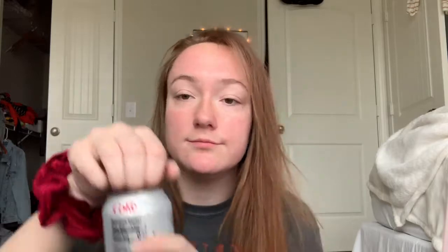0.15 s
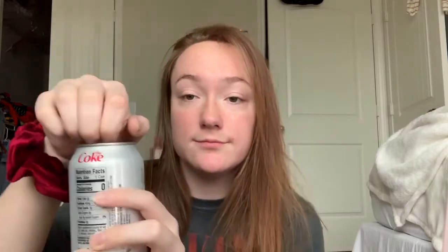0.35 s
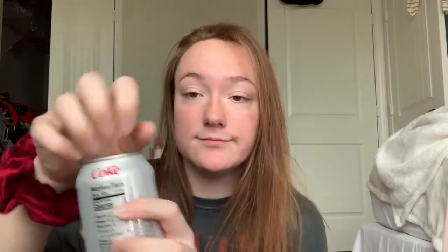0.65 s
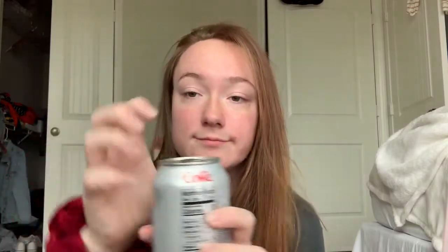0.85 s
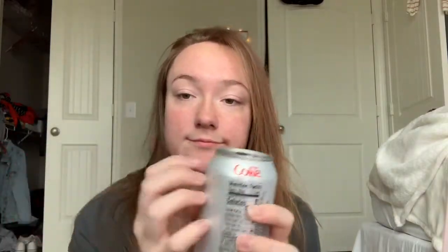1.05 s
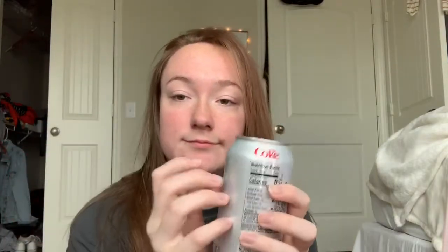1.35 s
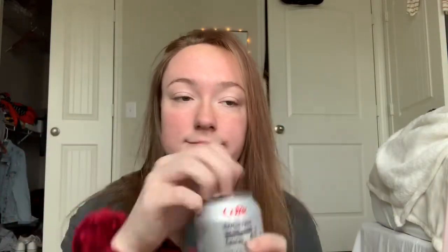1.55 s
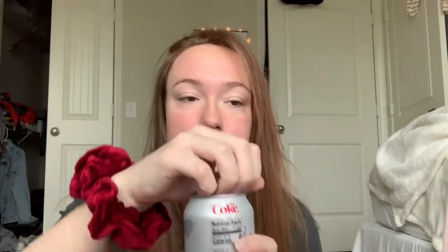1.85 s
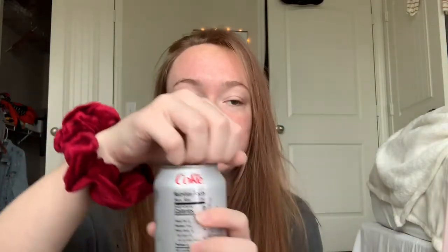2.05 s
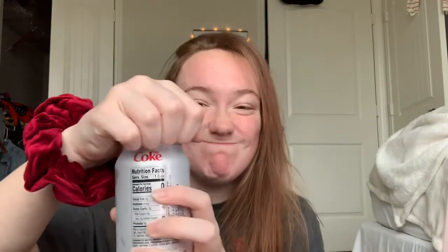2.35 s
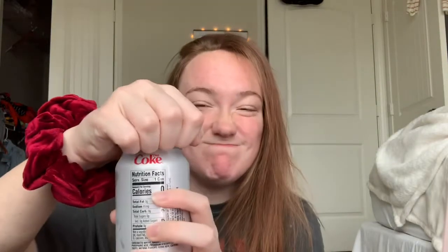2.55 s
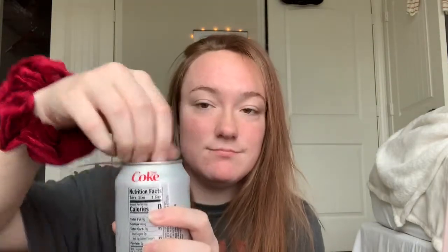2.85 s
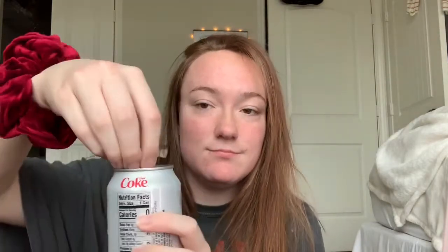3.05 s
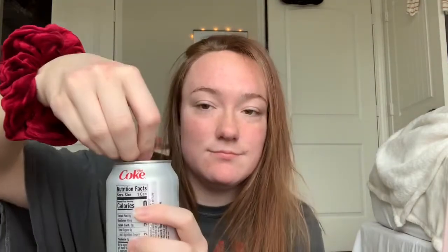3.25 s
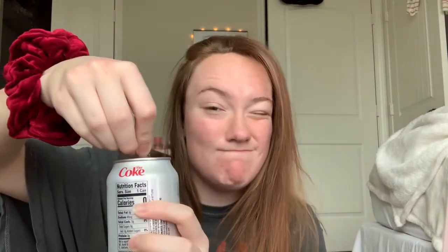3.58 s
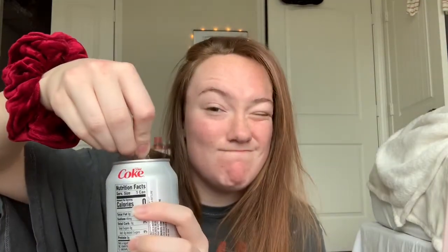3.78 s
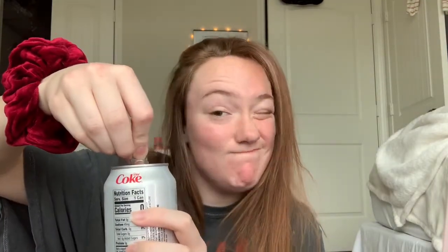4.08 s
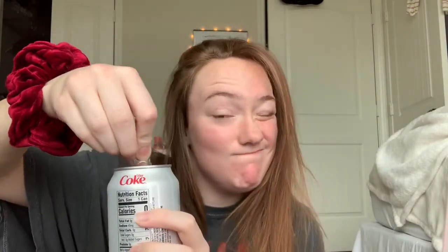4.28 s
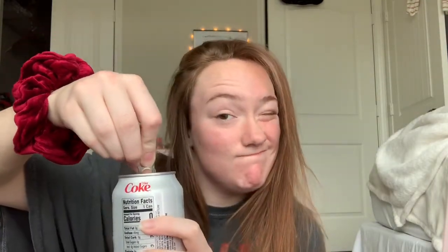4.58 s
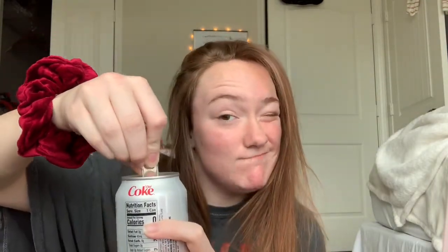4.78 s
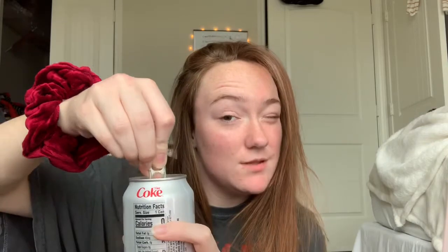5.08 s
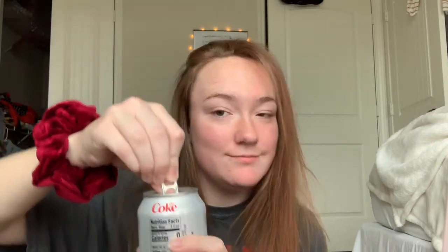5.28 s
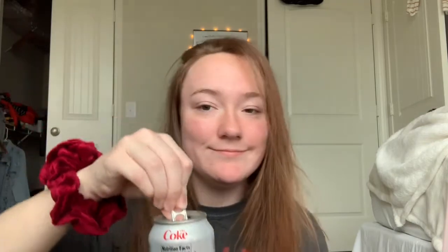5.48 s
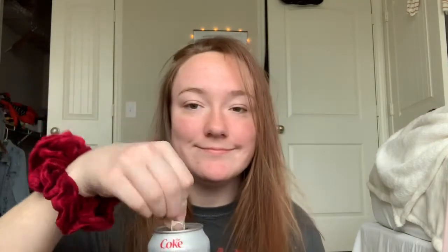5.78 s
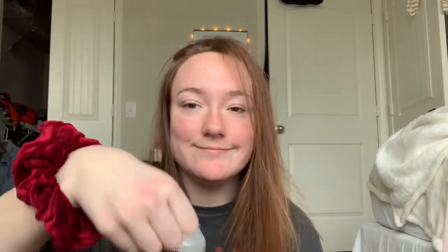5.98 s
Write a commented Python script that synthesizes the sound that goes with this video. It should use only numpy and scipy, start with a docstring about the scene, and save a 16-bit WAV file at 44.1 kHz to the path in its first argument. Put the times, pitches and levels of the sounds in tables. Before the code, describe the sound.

A quiet small bedroom with soft low rumble and steady air, heard close up in stereo. From 0 to 1.8 s, fingers lightly rub and tap a full aluminium can: faint scrapes and small tinny ticks, clearer around 0.27, 0.65 and 1.25-1.3 s. A bright hard click lands at 1.88 s, a softer one at 2.0. At 2.41 s the seal cracks very loudly, gas hisses sharply for about a tenth of a second, and a second, hollower crack at 2.5 s ends it. Soft fumbling ticks follow from 2.8 s, a crisp loud snap at 3.13, a small cluster near 3.5, and a rattling burst of clicks at 4.1-4.16. Separate metallic ticks at 4.34, 4.43, 4.64 and 4.77 lead to the lid tearing open at 4.82 s with a loud crack and short breathy puff. Faint fizz dies away with tiny taps until 5.4, swelling barely near 5.8 before room quiet at about 6.1.

```python
"""A small quiet bedroom: a full aluminium can is handled and opened close to a phone with two microphone ports.
Fingers rub, tap and pick at the tab: filtered noise for skin, bursts of slips ringing the can's modes for clicks.
The seal cracks with a short jet of gas and the lid tears open later: noise through resonances of the gas space.
Rough tones linger after some blows, and sparse random pops make the drink fizz faintly.
A noise-built room tail answers it all, over steady air, wavering tones and the low rumble of the house."""
import sys
import numpy as np
from scipy import signal
from scipy.fft import rfft, irfft, next_fast_len
from scipy.io import wavfile
from scipy.ndimage import uniform_filter1d, minimum_filter1d

SR = 44100
rng = np.random.default_rng(int(sys.argv[2]) if len(sys.argv) > 2 else 0)


def store_pcm(level_fs):
    """Save levels as 16-bit WAV."""
    pcm = np.round(np.clip(level_fs, -1, 1) * 32767).astype(np.int16)
    wavfile.write(sys.argv[1], SR, np.atleast_2d(pcm).T)


N = 270333  # samples


def undb(db):
    """Decibels to an amplitude ratio."""
    return 10 ** (np.asarray(db) / 20)


def level(x, db):
    """Scale a signal to an RMS level in dB."""
    return x * undb(db) / np.sqrt(np.mean(x ** 2))


def on_log(hz, table):
    """Read a (pitch_hz, value) table on a log-frequency axis."""
    at, value = np.transpose(table)
    return np.interp(np.log(hz + 1), np.log(at), value)


def colour(x, table):
    """Causal filter with the (pitch_hz, level_db) shape, from the folded cepstrum."""
    n = next_fast_len(x.shape[-1])
    gain = undb(on_log(np.fft.rfftfreq(n, 1 / SR), table))
    cepstrum = irfft(np.log(gain), n)
    cepstrum[1:n // 2] *= 2
    cepstrum[n // 2 + 1:] = 0
    response = np.exp(rfft(cepstrum))
    return irfft(rfft(x, n) * response, n)[..., :x.shape[-1]]


def band(x, hz, width_hz):
    """One resonance of the given pitch and width."""
    return signal.lfilter(*signal.iirpeak(hz, hz / width_hz, SR), x)


def envelope(tables, column=1):
    """Summed gain along tables of (time_s, level_db, ...), silent outside each."""
    t = np.arange(N) / SR
    gain = 0
    for table in tables:
        time_s, level_db = np.transpose(table)[[0, column]]
        gain = gain + undb(np.interp(t, time_s, level_db, -200, -200))
    return gain


def walk(rate):
    """Random level that slides to a new value `rate` times a second; spread near 1."""
    k = int(SR / rate)
    steps = np.repeat(rng.standard_normal(N // k + 1), k)
    return 1.2 * uniform_filter1d(steps, k)[:N]


# Spectrum of the room air, relative: pitch_hz, level_db (per Hz)
AIR_COLOUR = [(60, 1.5), (123, -6.5), (146, -13.5), (177, -3.5), (216, -15), (310, -12.5), (434, -19),
              (700, -28.5), (1300, -32), (1550, -40.5), (1850, -54.5), (4000, -56), (8000, -60.5),
              (13500, -64.5), (15000, -87.5)]


def house_air(air_db=-52.5, alike_hz=330):
    """Steady air noise, the same at both ports in the bass and partly different above alike_hz."""
    pair = np.array([[1], [-1]])
    side = signal.lfilter(*signal.butter(2, alike_hz, "high", fs=SR), rng.standard_normal(N))
    air = colour(rng.standard_normal(N) + .75 * side * pair, AIR_COLOUR)
    above_rumble = signal.butter(3, 95, "high", fs=SR, output="sos")
    return level(signal.sosfilt(above_rumble, air), air_db)


# Swell of the house rumble: time_s, level_db
RUMBLE_SWELL = [(0.0, -52), (0.01, -49.5), (1.3, -52), (1.55, -44.5), (1.64, -54.5), (3.0, -51), (4.3, -56),
                (4.46, -52.5), (6.13, -50)]


def house_rumble():
    """Noise from 20 to 95 Hz that swells and sinks, nearly alike at both ports."""
    pair = np.array([[1], [-1]])
    noise = rng.standard_normal(N) + 0.16 * rng.standard_normal(N) * pair
    lowest = signal.butter(3, [20, 95], "band", fs=SR, output="sos")
    return envelope([RUMBLE_SWELL]) * level(signal.sosfilt(lowest, noise), 0)


# Wavering low tones: pitch_hz, width_hz, level_db
HUM_TONES = [(50.6, 12, -58), (129.5, 6.1, -65), (187, 30, -59), (244.5, 4.7, -66)]


def house_hum():
    """Narrow bands of noise waver like unsteady tones, the same at both ports."""
    hum = 0
    for hz, width_hz, db in HUM_TONES:
        tone = band(band(rng.standard_normal(N), hz, width_hz), hz, 3 * width_hz)
        hum = hum + level(tone, db)
    return hum


# Time for the room to fall 60 dB: pitch_hz, t60_s
ROOM_DECAY = [(500, 0.72), (1700, 0.12), (3700, 0.4), (7000, 0.2), (14000, 0.2)]


def room(x, db=-14, early_db=-8, gap_s=0.0041, rise_s=0.002):
    """Hand and desk reflect first, walls after a gap; decay varies with pitch, ports are unrelated."""
    t = np.arange(SR * 3 // 5) / SR
    tail = 0
    for hz in 250 * np.sqrt(2) ** np.arange(12):  # half-octave bands
        noise = band(rng.standard_normal((2, len(t))), hz, hz / 3)
        tail = tail + noise * undb(-60 * t / on_log(hz, ROOM_DECAY))
    walls = 1 - np.exp(-np.maximum(t - gap_s, 0) / rise_s)
    tail = tail * (undb(early_db) + walls)
    tail = tail / np.sqrt(np.mean(np.sum(tail ** 2, axis=1)))  # unit energy
    return undb(db) * signal.fftconvolve(x[None], tail)[:, :N]


# Spectrum of the bubbles, relative: pitch_hz, level_db (per Hz)
BUBBLE_COLOUR = [(1500, -31), (2300, -6.5), (3100, 2.5), (4200, -8), (5500, -4), (7000, -13), (10700, -15),
                 (15000, -42)]


def fizz(start_s=4.97, start_db=-53, settled_db=-89.5, settle_s=0.35, spread_db=1.5):
    """Many tiny bubbles burst, most of them small; the froth settles and swells once more.

    Levels are those before the mix trim."""
    surge_s, surge_db, surge_width_s = 5.78, 13, 0.092
    t = np.arange(N) / SR
    settle = np.exp(-np.maximum(t - start_s, 0) / settle_s)
    surge = surge_db * np.exp(-((t - surge_s) / surge_width_s) ** 2)
    db = settled_db + (start_db - settled_db) * settle + surge
    bursting = rng.random(N) < .1
    pops = rng.standard_normal(N) * bursting * undb(spread_db * rng.exponential(size=N))
    return (t > start_s) * undb(db) * level(colour(pops, BUBBLE_COLOUR), 0)


# Tones left in lid and gas space after the harder blows; level is before fade and port balance:
# start_s, pitch_hz, sink_hz, level_db, t60_s
LINGERING_TONES = [(.272, 4290, 40, -54, 0.17), (.648, 2350, 3, -49.5, 0.1), (1.252, 608, 3, -45, .15),
                   (1.307, 1286, 3, -50.5, 0.28), (1.885, 2366, 3.4, -39.5, 0.18),
                   (2.51, 3767, 125, -37.5, 0.81), (2.5235, 1773, 20, -9, 0.06),
                   (2.535, 1874, 243, -36.5, 0.54), (3.127, 1166, 2.7, -33, .06),
                   (3.51, 3700, 2.5, -49.5, 0.28), (4.142, 3880, 106, -43, 0.39),
                   (4.83, 3397, 107, -31, 0.46)]


def linger(width=.1):
    """Slow noise roughens a sinking, fading sine; ports unrelated, the right one nearer.

    width is a share of the pitch."""
    out = np.zeros((2, N + SR))
    t = np.arange(SR // 2) / SR
    for start_s, first_hz, sink_hz, db, t60 in LINGERING_TONES:
        wobble = rng.standard_normal((2, len(t))) + 1j * rng.standard_normal((2, len(t)))
        wobble = signal.lfilter(*signal.butter(2, width * first_hz / 2, fs=SR), wobble)
        hz = first_hz - sink_hz * (1 - np.exp(-t / .1))
        carrier = np.exp(2j * np.pi * np.cumsum(hz) / SR)
        tone = level((wobble * carrier).real, db)
        fade = undb(-60 * t / t60) * np.minimum(t / .002, 1)
        i = int(start_s * SR)
        out[:, i:i + len(t)] += tone * undb([[-1.5], [1.5]]) * fade
    return out[:, :N]


# Modes of the can's lid, tab and wall, before detuning: pitch_hz, level_db (relative), t60_s
CAN_MODES = [(713, -3.5, 0.023), (1320, -3.5, 0.015), (1834, -9, 0.013), (2360, -7.5, 0.0081),
             (3640, -4.5, 0.051), (4170, -6.5, 0.028), (4760, -7.5, 0.03), (5640, 0, 0.022),
             (6260, -3.5, 0.03), (8140, -3, 0.044), (8660, -4.5, 0.012), (10570, -3.5, 0.0063),
             (13990, 5.5, 0.0075)]


def ring(x, detune=1):
    """The can's modes answer a force as decaying sines, all shifted by the detune ratio."""
    out = 0
    for hz, db, t60 in CAN_MODES:
        pole = np.exp(2j * np.pi * detune * hz / SR - np.log(1000) / (t60 * SR))
        out = out + undb(db) * signal.lfilter([1], [1, -pole], x).imag
    return out


# Strokes of skin on metal, level before the mix trim: loudest_s, level_db, build_up_s, fade_s
RUB_STROKES = [(0.001, -60.5, .002, 0.028), (0.083, -63, 0.046, 0.012), (0.185, -65, 0.014, 0.043),
               (0.244, -49.5, 0.093, 0.05), (0.535, -74.5, .015, 0.092), (0.607, -56.5, 0.017, 0.0062),
               (0.992, -63, .004, .03), (1.045, -60, 0.011, 0.044), (1.095, -66, 0.013, 0.045),
               (1.172, -68, .005, 0.023), (1.256, -50.5, 0.0076, 0.029), (1.311, -47.5, 0.0095, .03),
               (1.345, -65, 0.022, .04), (1.455, -55, 0.0094, .05), (1.515, -64, 0.0054, 0.063),
               (1.635, -53, 0.022, 0.04), (1.775, -61.5, .04, 0.066), (1.873, -51.5, 0.028, 0.0034),
               (2.83, -65, .08, 0.11), (2.939, -64, .05, 0.059), (3.434, -72, 0.038, 0.059),
               (4.1, -34.5, 0.0028, 0.053)]
# Spectrum of the rubbing, relative: pitch_hz, level_db (per Hz)
SKIN_COLOUR = [(880, -33), (1500, -3.5), (2830, -11), (4290, -3.5), (5120, -11), (5880, 1), (7170, -14.5),
               (8320, -1.5), (9370, -21), (11000, -12), (12100, -24), (16000, -26)]


def rub(grip_db=3.5, ring_db=-38, range_db=20):
    """Skin ridges catch unevenly and stir the can's modes; strokes build up and fade over range_db."""
    strokes = []
    for loudest_s, db, rise_s, fade_s in RUB_STROKES:
        start, end = (loudest_s - rise_s, db - range_db), (loudest_s + fade_s, db - range_db)
        strokes.append([start, (loudest_s, db), end])
    catch = rng.standard_normal(N) * undb(grip_db * walk(210))
    skin = colour(catch + undb(ring_db) * ring(catch), SKIN_COLOUR)
    return envelope(strokes) * level(skin, 0)


# Gas course through thin slit, tearing score line, open hole; tones are relative to the jet:
# time_s, jet_db, low_tone_db, high_tone_db
GAS_COURSE = [
    [(2.416, -27.5, -15.5, 2.5), (2.422, -31.5, -6, -14), (2.442, -19.5, -12.5, -21),
     (2.486, -20.5, -16.5, -15), (2.506, -29.5, 5.5, -1), (2.6, -50, 3, 2)],
    [(4.801, -47.5, -3.5, 4.75), (4.817, -19, -8.5, 1.42)],
    [(4.826, -29.5, -7, -4.5), (4.828, -31.5, 0.5, 6), (4.842, -23, -3.5, -5.5), (4.856, -31, -8.5, 1.5),
     (4.952, -51, -9, 2.5), (5.0, -53, 0.5, -2.5)],
]
# Jet spectrum for the same three openings, relative: pitch_hz, level_db (per Hz)
GAS_COLOURS = [
    [(1500, -16.5), (2900, -25.5), (3600, -13.5), (5000, -6.5), (12000, -5), (13600, 1.5), (15500, -1.5),
     (16500, -9.5)],
    [(500, -24), (1500, -37), (5000, -5.5), (8000, -0.5), (9000, -21.5), (16000, -34)],
    [(400, -27.5), (1000, 1.5), (3000, -6), (5400, -3.5), (11000, -1), (13500, -10.5), (16000, -29.5)],
]
# Low and high resonance of the gas under the lid, same three openings: pitch_hz, width_hz
GAS_RESONANCES = [
    [(1900, 510), (3800, 650)],
    [(1500, 2100), (3800, 3760)],
    [(1400, 710), (3800, 5600)],
]


def jets(flutter_db=2.5, right_db=6):
    """Gas rushes through the opening and excites the gas under the lid; its low tone faces the right port."""
    out = 0
    toward_right = undb([[-right_db / 2], [right_db / 2]])
    for course, shape, resonances in zip(GAS_COURSE, GAS_COLOURS, GAS_RESONANCES):
        rush = level(colour(rng.standard_normal(N), shape), 0) * undb(flutter_db * walk(230))
        tones = []
        for hz, width_hz in resonances:
            tone = band(band(rng.standard_normal(N), hz, width_hz), hz, width_hz)
            tones.append(level(tone, 0) * undb(flutter_db * walk(130)))
        low = tones[0] * envelope([course], column=2) * toward_right
        high = tones[1] * envelope([course], column=3)
        out = out + envelope([course]) * (rush + low + high)
    return out


# Finger clicks, peak before port balance; lid and body levels shape the spectrum around the strongest ring:
# start_s, peak_db, ring_hz, lid_hz, lid_db, body_db, left_minus_right_db
FINGER_CLICKS = [(0.0824, -48.5, 5300, 2240, -14, -8, -3), (0.173, -50, 4600, 1590, -28, -29, -8),
                 (0.2723, -34.5, 4260, 1980, -12, -30, -4), (0.611, -38.5, 6170, 1650, -21, -32, -0.5),
                 (0.6459, -32, 6240, 2450, -11, -41, 3), (1.014, -45, 6900, 1540, -25, -11, 6),
                 (1.038, -44.5, 4930, 2520, -20, -19, -6), (1.0857, -41, 5830, 2800, -12, -23, 7),
                 (1.1518, -50.5, 3110, 2140, -30, -9, -5), (1.251, -34, 6000, 1530, -6.5, -11, -1),
                 (1.3051, -33, 5870, 1520, -22.5, -21.5, -0.5), (1.4476, -35.5, 8660, 1500, -27, -12, -7),
                 (1.51, -49, 8200, 1500, -20, -23, 12), (1.577, -48.5, 3300, 2140, -3, -3, -2.5),
                 (1.6151, -40.5, 6370, 2600, -7.5, -31.5, -1), (1.6382, -37.5, 8400, 2280, -36, -24.5, 1),
                 (1.8815, -7.5, 7470, 2400, -14.5, -36, -4.5), (2.0059, -31, 5680, 1980, -13.5, -24, 0),
                 (2.2095, -49.5, 4930, 2000, -1.5, -5.5, -13), (2.412, -0.5, 4480, 1880, -36.5, -39, -2),
                 (2.4972, -14.5, 3800, 1940, -5, -21.5, -4), (2.5014, -3, 4750, 1930, -4, -21.5, -5),
                 (2.5245, -4.5, 4340, 1720, -1, -11, -2.5), (2.5501, -28, 3760, 1810, -2, -35.5, -2.5),
                 (2.7913, -38.5, 4100, 2430, -15, -12.5, -10), (2.837, -38.5, 3540, 1480, -1.5, -1.5, -2.5),
                 (2.8823, -33.5, 3390, 2590, -4.5, -10.5, -3), (2.9133, -44, 3340, 1530, -16.5, -17, -4.5),
                 (3.037, -38.5, 5360, 2270, -19.5, -8.5, -10), (3.0639, -49, 4860, 1560, -14.5, -5.5, -12),
                 (3.1272, -5, 7900, 2020, -42.5, -27, 3.5), (3.1284, -4.5, 5500, 2005, -28, -21.5, 3),
                 (3.4701, -37, 3640, 2115, -41, -19, -3), (3.48, -26.5, 5110, 1480, -27, -31, -7.5),
                 (3.4969, -19.5, 5000, 1600, -22.5, -31.5, -3), (3.5074, -14.5, 5040, 2620, -31, -41.5, -8),
                 (4.0936, -10, 8670, 1574, -35, -34, -7), (4.1068, -23, 5630, 1930, -52, -23, -8),
                 (4.1267, -19.5, 5500, 1560, -30, -39, -2), (4.137, -11.5, 5130, 1560, -40.5, -28, 2),
                 (4.1409, -7.5, 5660, 2260, -34.5, -31.5, -5.5), (4.1627, -22, 5400, 2300, -35, -32, 4),
                 (4.34, -25.5, 5330, 1640, -38, -23.5, -3.5), (4.4272, -17, 5340, 1610, -44, -26.5, -1),
                 (4.4444, -25, 5670, 2490, -29.5, -21, -3.5), (4.638, -22, 5590, 1520, -29.5, -25.5, -2),
                 (4.77, -16.5, 5680, 2580, -26.5, -30, -3.5),
                 (4.8178, -3.5, 5370, 1500, -19.5, -22.5, 10.5), (5.1329, -47, 3215, 1560, -14, -6, -14),
                 (5.204, -46, 3340, 1580, -10, 8, -7), (5.2578, -38.5, 4150, 1596, -14, -6.5, -2),
                 (5.2746, -46, 3050, 1640, -20, -2, -3), (5.4108, -53, 3000, 1578, -28, -10, -7),
                 (5.8943, -51.5, 3750, 1500, 17, 6, -7)]
# How the can is held and touched; edge shapes the top treble, contact is twice the rise to the peak:
# time_s, body_hz, edge_db, contact_ms, room_share_db
HAND_GRIP = [(0.1, 590, -22, 1.4, -3), (0.65, 620, -40, 2.7, 4), (1.0, 597, -24, 3, 9),
             (1.26, 600, -20, 2.9, 9.5), (1.3, 1330, -18.5, 3.4, 3), (1.641, 1320, -33.5, 3, 13),
             (1.88, 745, -24, 2.4, 6.5), (2.42, 1430, -19.5, 1.2, 4), (2.53, 1430, -28.5, 2.5, 5),
             (2.8, 1026, -29, 2.1, 8), (3.13, 1153, -7.5, 1.1, 4), (3.47, 650, -16.5, 2.1, 0),
             (4.15, 770, -19.5, 1.5, -1), (4.34, 900, -23, 1.7, 0.5), (4.775, 1047, -17, 1.7, 2),
             (4.815, 1200, -22, 1.562, .3), (5.2, 1150, -15.5, 1.2, 7), (5.9, 900, -32, 1.4, 12)]


def clicks(ring_db=-35, ring_width=1.124, skirt_db=-7.5, ring_in_room=.4):
    """A burst of tiny slips cracks and rings the can; gives the direct pair and the room's share.

    ring_width is a ratio to either side, skirt_db the level there, ring_in_room the share of that
    peak, in dB, that the room hears."""
    direct, send = np.zeros((2, N + 4096)), np.zeros(N + 4096)
    t = np.arange(4000) / SR
    at, *grip = np.transpose(HAND_GRIP)
    for start_s, db, hz, lid_hz, lid_db, body_db, pan_db in FINGER_CLICKS:
        body_hz, edge_db, ms, room_db = (np.interp(start_s, at, c) for c in grip)
        slips = rng.standard_normal(len(t)) * t * np.exp(-2000 * t / ms)
        # The grip detunes the modes a little from click to click
        force = slips + undb(ring_db) * ring(slips, 1 + 0.032 * rng.standard_normal())
        shape = [(body_hz / 3.6, body_db - 20.5), (body_hz, body_db + 12.0),
                 (1420, (body_db + lid_db) / 2 + 5.0), (lid_hz, lid_db + 10.5), (2800, -20),
                 (hz / ring_width, skirt_db), (hz * ring_width, skirt_db),
                 (12500, edge_db + 5.5), (16000, edge_db - 4.5)]
        hit = colour(force, sorted(shape + [(hz, 0)]))
        far = colour(force, sorted(shape + [(hz, skirt_db * (1 - ring_in_room))]))
        hit, far = np.array([hit, far]) * undb(db) / np.abs(hit).max()
        i = int(start_s * SR)
        lag = rng.integers(0, 5)  # samples: the hand moves, so the path to the left port varies
        direct[0, i + lag:i + lag + len(t)] += hit * undb(pan_db / 2)
        direct[1, i + 1:i + 1 + len(t)] += hit * undb(-pan_db / 2)
        send[i:i + len(t)] += far * undb(room_db)
    return direct[:, :N], send[:N]


def scene():
    """Mix the can close to the ports with its room tail and the house behind."""
    direct, send = clicks()
    gas, skin, bubbles = jets(), rub(), fizz()
    to_room = send + undb(6) * gas.mean(axis=0) + undb(7.5) * skin + undb(11) * bubbles
    close = direct + gas + undb(-2.5) * skin + undb(-4.5) * bubbles + linger()
    house = house_air() + house_rumble() + house_hum()
    return close + room(to_room) + house


def record(dry, top=0.55, depth=1.0):
    """Gain ducks just after a loud peak; one capsule feeds the treble of both channels, the right one late."""
    held = -minimum_filter1d(-np.abs(dry).max(axis=0), size=400, origin=199)  # peak of the last 400 samples
    duck = np.minimum(top / np.maximum(held, 1e-9), 1) ** depth
    x = dry * uniform_filter1d(np.roll(duck, shift=110), size=60)
    n = next_fast_len(N)
    hz, both = np.fft.rfftfreq(n, 1 / SR), rfft(x, n)
    share = np.clip((hz - 6500) / 800, 0, 1)
    late = np.exp(-2j * np.pi * (hz - 8300) / 2450)  # delay of 1/2450 s, in phase at 8300 Hz
    both[1] = np.sqrt(1 - share) * both[1] + np.sqrt(share) * late * both[0]
    both *= undb(np.interp(hz, [15720, 15950, 16800], [0, -26, -45]))
    x = np.clip(irfft(both, n)[:, :N], -.97, .97)
    return signal.sosfilt(signal.ellip(8, .2, 70, 17000, fs=SR, output="sos"), x)


dry = scene()
out = record(dry)
store_pcm(out)
```